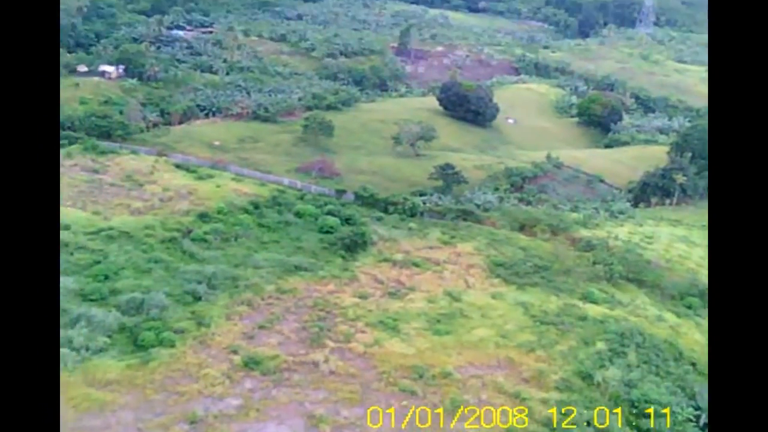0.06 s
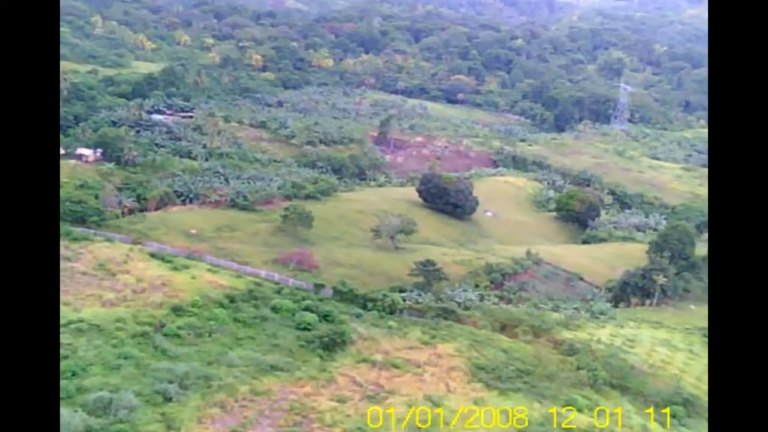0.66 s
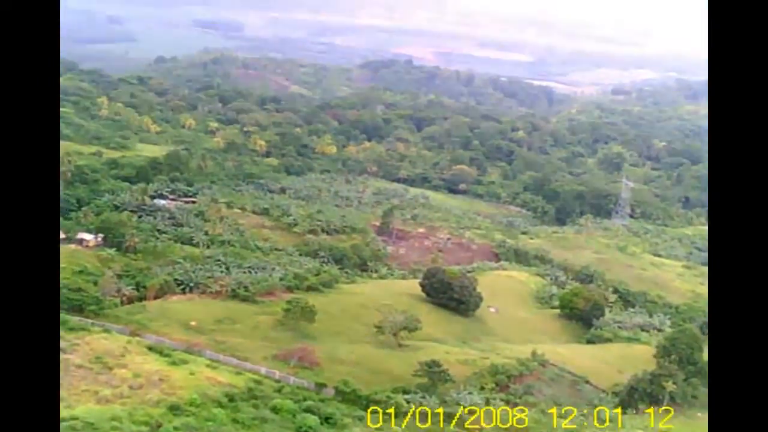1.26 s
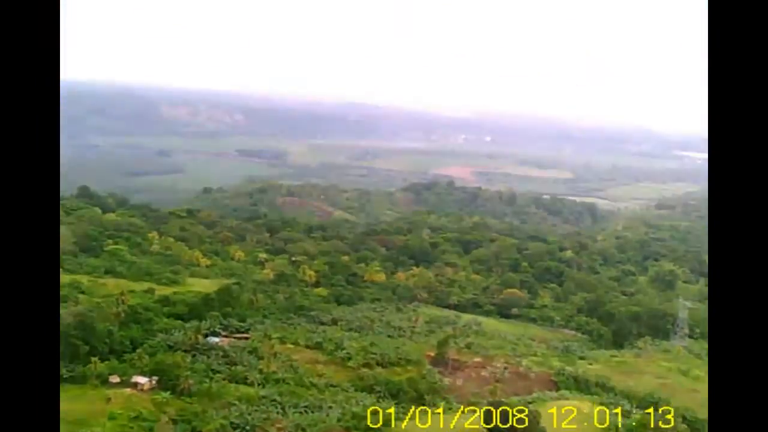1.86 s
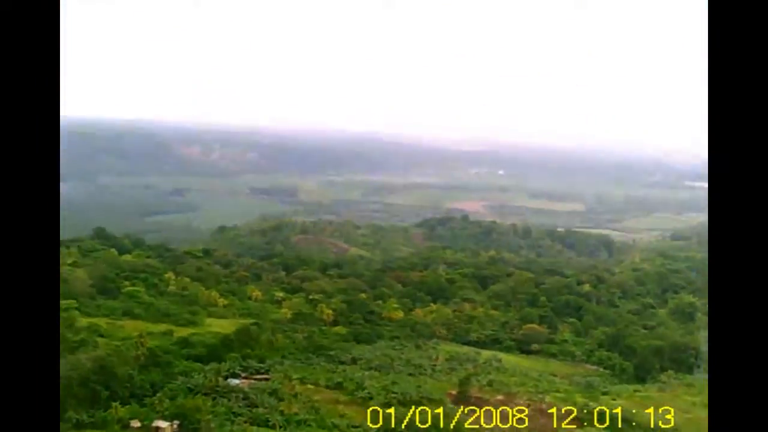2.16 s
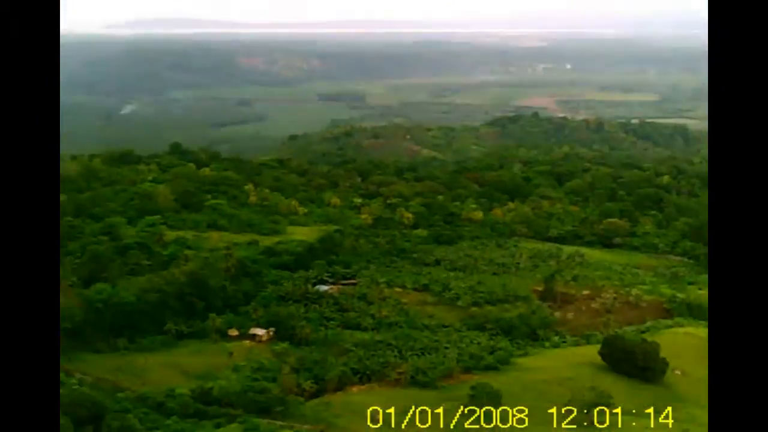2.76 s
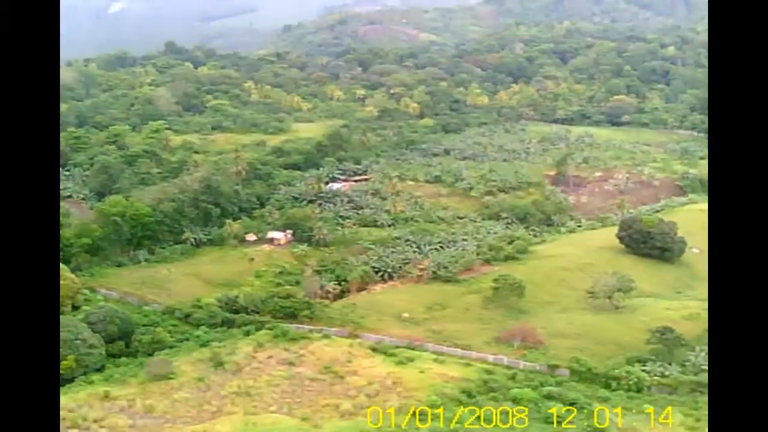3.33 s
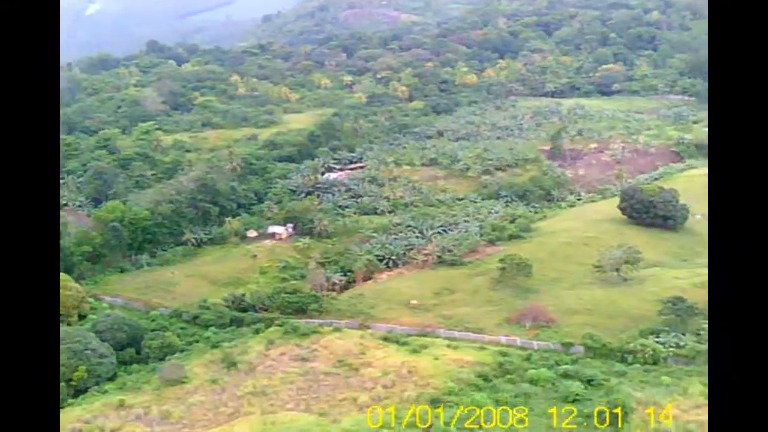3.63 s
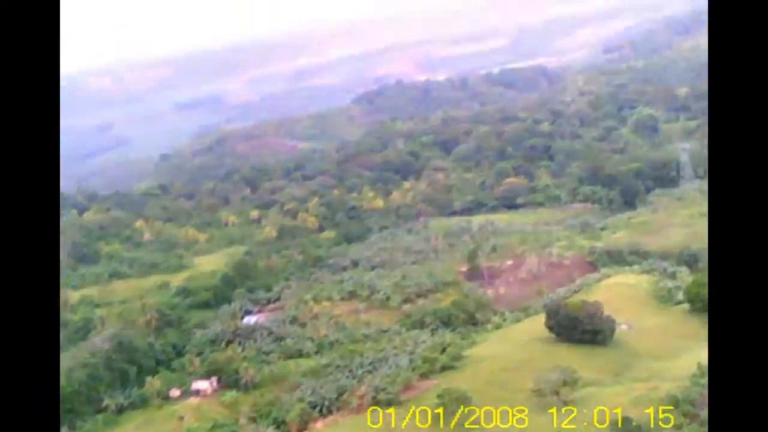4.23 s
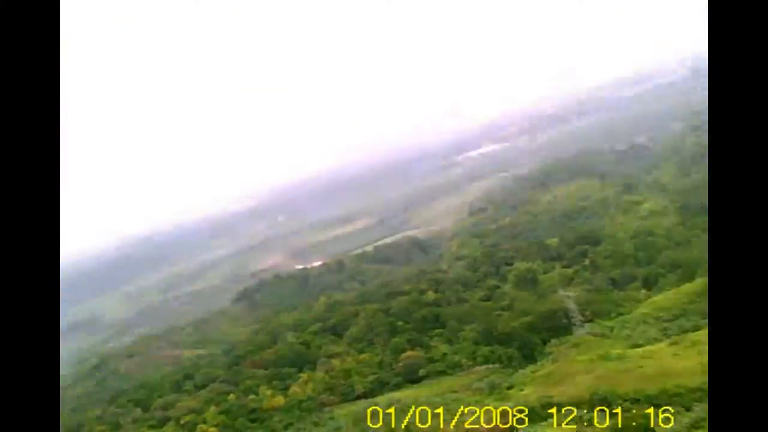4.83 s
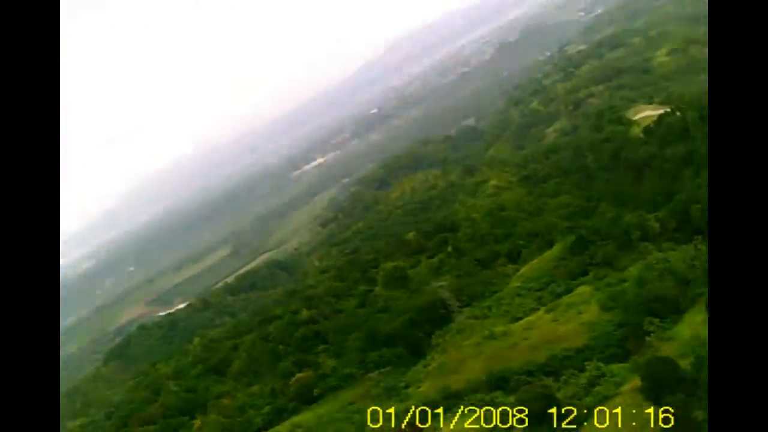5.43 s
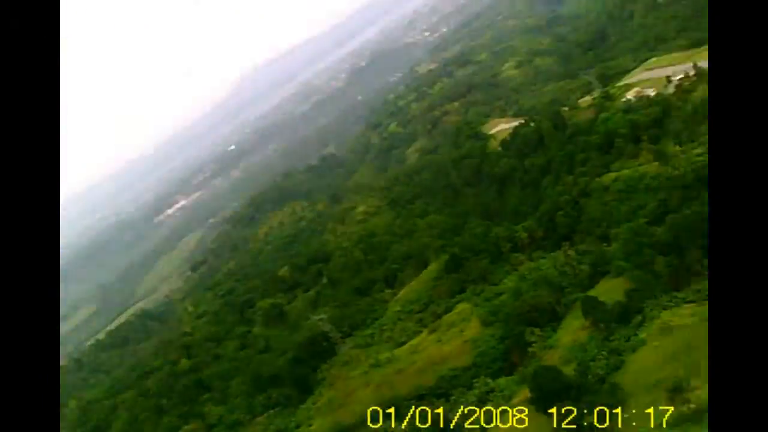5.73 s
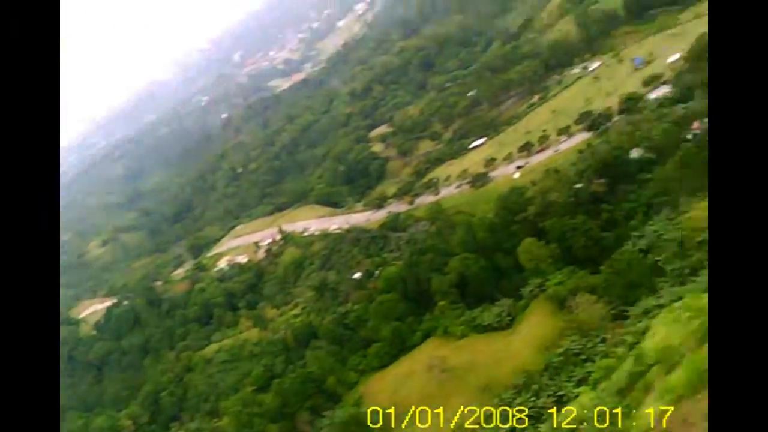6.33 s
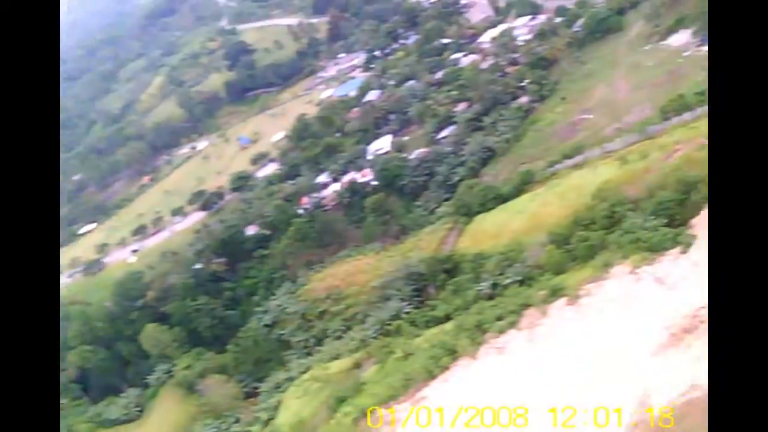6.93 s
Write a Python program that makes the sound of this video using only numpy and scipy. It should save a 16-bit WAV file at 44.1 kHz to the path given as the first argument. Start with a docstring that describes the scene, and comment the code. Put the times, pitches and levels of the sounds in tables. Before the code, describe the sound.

A small model plane's electric motor and propeller buzz and whine at one steady pitch while gusts of air buffet the onboard microphone.

```python
"""A model plane's electric motor and two-bladed propeller, close up, on a small camera fixed to the airframe.
They hold one speed: a buzzing stack of shaft orders under a thin, high whine.
The airframe rasps and each blade throws a puff of hiss. The slipstream, slack in the climb
and stronger in the banked dive, buffets the microphone in gusts."""
import sys
import numpy as np
from scipy import signal
from scipy.fft import rfft, irfft
from scipy.io import wavfile

SR = 44100
rng = np.random.default_rng(int(sys.argv[2]) if len(sys.argv) > 2 else 0)


def dump(signal):
    """Clip the signal to [-1, 1] and save it as 16-bit WAV at the path in sys.argv[1]."""
    limited = np.clip(np.atleast_2d(signal).T, -1, 1)
    pcm = np.round(limited * 32767).astype(np.int16)
    wavfile.write(sys.argv[1], SR, pcm)


N = 316638
TIME = np.arange(N) / SR
SHAFT_HZ, BLADES = 190.56, 2


def from_db(db):
    return 10 ** (np.asarray(db) / 20)


def unit(x):
    """Scales to rms 1."""
    return x / np.sqrt(np.mean(x ** 2) + 1e-20)


def colour(x, spectrum):
    """Shapes x by (frequency_hz, relative_db) points, then scales to rms 1."""
    hz, db = np.transpose(spectrum)
    bins = np.fft.rfftfreq(N, 1 / SR)
    gain = from_db(np.interp(np.log(bins + 1), np.log(hz), db, right=-100))
    return unit(irfft(rfft(x) * gain, N))


def wander(rate_hz):
    """A random drift of rms 1, gliding to a new value rate_hz times a second."""
    steps = rng.standard_normal(4096)
    return unit(np.interp(TIME * rate_hz, np.arange(len(steps)), steps))


def tone(cycles, db, sway, drift_db=0.5):
    """A partial whose strength sways in the turbulent air and drifts with the load."""
    strength = from_db(db + drift_db * wander(3.51)) * (1 + sway * wander(8))
    return np.sqrt(2) * strength * np.cos(2 * np.pi * cycles)


def through_airframe(order, turns, smear_cycles=0.012, low_smear_cycles=0.09):
    """Cycles of one shaft order at the camera: higher bending waves cross the airframe sooner."""
    return order * turns + smear_cycles * order ** 2 + low_smear_cycles * min(order, 9) ** 2


def motor(turns, load_db=0.55, ease_db_per_s=-0.19, shimmer=0.14, tremble_db=0.5):
    """Hum, buzz and whine: each turn of the shaft is one push, smeared out by the airframe."""
    # Tones at multiples of the shaft rate; order 42, the motor's switching, is the whine: order, level_db
    shaft_tones = [(1, -26.5), (2, -37), (3, -22.5), (4, -24.5), (5, -35), (6, -33.3), (7, -45), (8, -37.5),
                   (9, -53.5), (10, -37.5), (11, -54), (12, -44.5), (13, -53.5), (14, -36.5), (15, -56),
                   (16, -39), (17, -59), (18, -34), (19, -58), (20, -39), (21, -60), (22, -46.5),
                   (24, -53.5), (25, -66), (26, -49.5), (27, -58), (28, -56), (29, -45.5), (30, -58),
                   (31, -46.3), (32, -58.5), (33, -59), (34, -51.5), (35, -49), (36, -52.5), (37, -63),
                   (38, -51), (39, -54.5), (40, -41.5), (41, -39.7), (42, -25.5), (43, -68), (44, -53),
                   (49, -55), (56, -58.5)]
    out = np.zeros(N)
    load = from_db(load_db * wander(7))
    for order, db in shaft_tones:
        low, buzzing = order <= 4, order < 28
        sway = 0.25 if order <= BLADES else 0.078 if buzzing else 0.012
        if low:
            db = db + ease_db_per_s * (TIME - TIME.mean())
        cycles = through_airframe(order, turns) + 0.05 * rng.standard_normal()
        partial = tone(cycles, db, sway, drift_db=0.46 if buzzing else 0.17)
        if buzzing and order % BLADES == 0:
            partial *= 1 + shimmer * wander(70)  # blades meet uneven air
        if buzzing and not low:
            partial *= load  # the middle orders swell together with the propeller's load
        out += partial
    return out * from_db(tremble_db * wander(65))  # the whole buzz trembles with the airframe


def flutter(turns, turns_per_beat=9, lead_cycles=0.17, slip_beats=0.11, jitter_beats=0.012):
    """The low orders throb together about 21 times a second, slipping a little against the shaft."""
    # Side tones by the low orders: order, offset_steps (rounded to whole flutter rates), level_db
    side_tones = [(3, 1, -32), (3, 2, -26), (4, 1.5, -43.5), (4, 3, -43.0), (5, -1, -46.8), (5, 1.5, -41),
                  (5, 2, -41), (5, 3, -39.5), (6, 1.5, -41), (6, 2, -45.5), (6, 3, -36.5), (7, -1, -50.2),
                  (7, 1, -47), (7, 3.5, -48.7), (7, 3.5, -49), (8, 2, -52.5), (8, 4, -47.5)]
    beats = turns / turns_per_beat + slip_beats * wander(1.214) + jitter_beats * wander(12)
    return sum(tone(through_airframe(order, turns) + round(steps) * beats + lead_cycles, db, sway=0.13)
               for order, steps, db in side_tones)


def bearings():
    """Thin bearing tones, which the airframe brings out near 3 kHz."""
    # Tones off the shaft's multiples: pitch_hz, level_db
    bearing_tones = [(2353, -52), (2908, -55.5), (2912, -49), (2986, -35.5), (3024, -47), (3063, -46),
                     (3137, -31), (3221, -42.5), (4060, -54.5), (7601, -50)]
    return sum(tone(hz * TIME + rng.random(), db, sway=0.062) for hz, db in bearing_tones)


def blade_noise(turns, spectrum, puff, sharpness):
    """Steady turbulence plus a short puff at every blade pass."""
    passing = (0.5 + 0.5 * np.cos(2 * np.pi * BLADES * turns)) ** sharpness
    return colour(rng.standard_normal(N) * (1 + puff * passing), spectrum)


def airframe_rasp(turns, level_db=-32.5):
    """The airframe rasps round its resonance, pulsing lightly with the blades."""
    # Resonance of the airframe: frequency_hz, relative_db
    resonance = [(1500, -42), (2200, -21), (2650, -5.5), (3100, 0), (3450, -6.2), (3800, -7), (4300, -21),
                 (5500, -33)]
    return from_db(level_db) * blade_noise(turns, resonance, puff=0.23, sharpness=2)


def tip_hiss(turns, level_db=-33.5):
    """Each blade tip throws a sharp puff of hiss as it passes."""
    # Spectrum of the hiss: frequency_hz, relative_db
    hiss = [(2000, -38), (4400, -8), (5500, -6.5), (6500, -3.5), (7100, -4), (7700, 2.5), (8300, -3),
            (8900, -27.5), (9700, -7), (10300, -12.5), (11100, -23.5)]
    return from_db(level_db) * blade_noise(turns, hiss, puff=2.4, sharpness=6.9)


def slipstream(roughen_db_per_s=0.86):
    """Air thumps, buffets and rushes over the microphone with the airspeed; gusts swell the low end."""
    # Airflow against cruise, slack in the climb and building in the dive: time_s, strength_db
    airspeed = [(0, 3), (0.7, -0.3), (1.3, 0.5), (2.3, -5), (2.8, -2), (3.5, -1.4), (5.1, -1), (6.6, 2),
                (7.18, 3.1)]
    # Gusts on the microphone, each a smooth bell: middle_s, length_s, swell_db
    gusts = [(.26, 0.22, 5.5), (1.25, 0.26, 3), (2.874, .22, 4.5), (3.874, .4, 5.5), (4.68, .45, 6),
             (5.602, 1, 5.5), (6.198, 0.43, 3.5), (6.575, .28, 4.5)]
    # Spectra of the air's deep thump, low buffet and rush: frequency_hz, relative_db
    thump = [(6, -4), (15, -5), (29, 7), (45, -.5), (62, -11), (120, -29)]
    buffet = [(25, -16), (55, -1.5), (100, -0.5), (130, -3), (240, -11.5), (480, -20), (900, -43)]
    rush = [(40, -20), (130, -1.5), (240, -0.5), (480, -4), (650, -3.5), (900, -6.5), (1100, -8),
            (1400, -9.5), (1700, -17.5), (2000, -27), (2600, -43), (5000, -66)]
    flow_db = np.interp(TIME, *np.transpose(airspeed))
    gust_db = sum(db * np.exp(-(2 * (TIME - middle) / length) ** 2) for middle, length, db in gusts)
    rough_db = gust_db + roughen_db_per_s * (TIME - TIME.mean())  # the air grows steadily rougher
    thump_db = -22 + 0.37 * flow_db + 0.26 * rough_db + 0.8 * wander(8)
    buffet_db = -24.5 + 0.75 * flow_db + rough_db + wander(25)
    rush_db = -21.5 + 0.73 * flow_db + 0.58 * wander(60)
    layers = [(thump, thump_db), (buffet, buffet_db), (rush, rush_db)]
    return sum(from_db(db) * colour(rng.standard_normal(N), spectrum) for spectrum, db in layers)


def scene():
    """Motor, propeller and air in flight, all close to one microphone."""
    turns = SHAFT_HZ * TIME + 0.0003 * wander(9)  # the speed holds, the shaft's angle wobbles slightly
    propeller = airframe_rasp(turns) + tip_hiss(turns)
    return (motor(turns) + flutter(turns) + bearings() + propeller + slipstream())[None]


def record(dry, mirror_trim_db=-0.1, cutoff_hz=15520):
    """The camera samples at half rate; straight lines between samples mirror the whine up an octave or so."""
    hz = np.fft.rfftfreq(N, 1 / SR)
    top_octave = hz > SR / 4
    lower_band = irfft(rfft(dry) * ~top_octave, N)
    flipped = rfft(lower_band * (-1.0) ** np.arange(N))  # the spectrum turned end for end
    rolloff = np.tan(np.pi * np.maximum(hz, SR / 4) / SR) ** 2
    mirror = irfft(flipped * top_octave / rolloff, N)
    clipped = np.clip(lower_band + from_db(mirror_trim_db) * mirror, -0.95, 0.95)
    lowpass = signal.firwin(1023, cutoff_hz, window=("kaiser", 9), fs=SR)
    return signal.oaconvolve(clipped, lowpass[None], "same")


dry = scene()
out = record(dry)
dump(out)
```